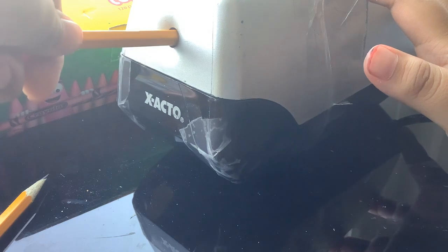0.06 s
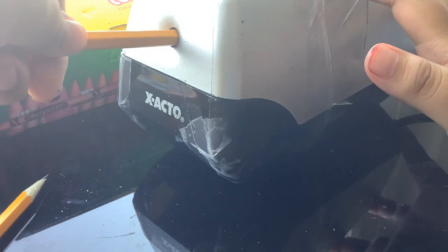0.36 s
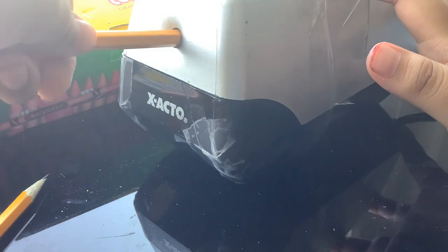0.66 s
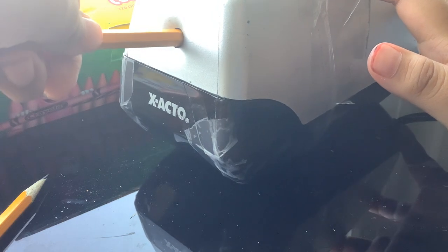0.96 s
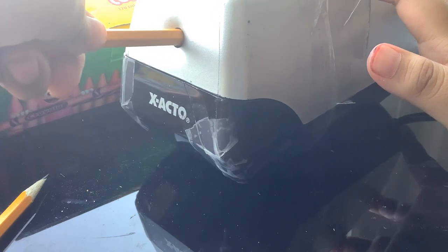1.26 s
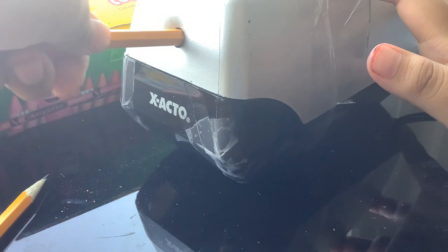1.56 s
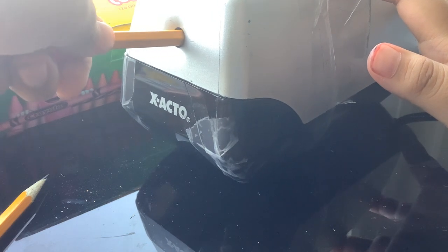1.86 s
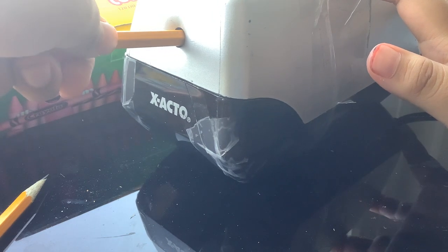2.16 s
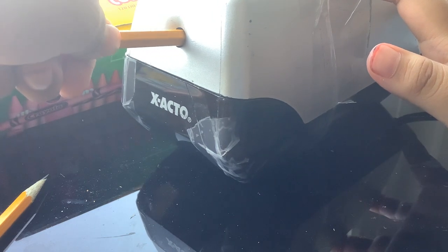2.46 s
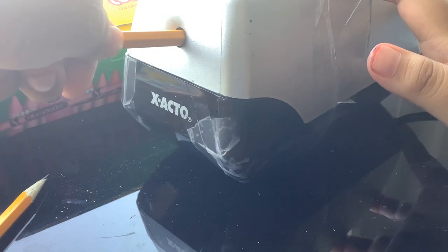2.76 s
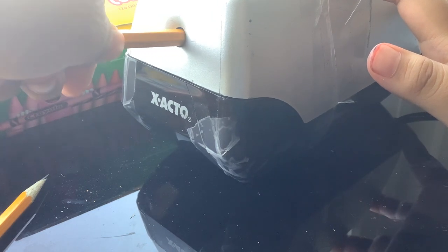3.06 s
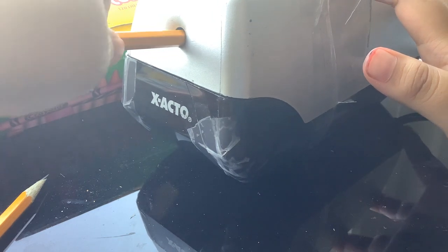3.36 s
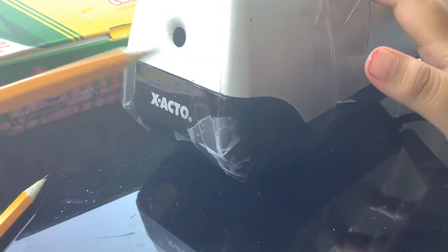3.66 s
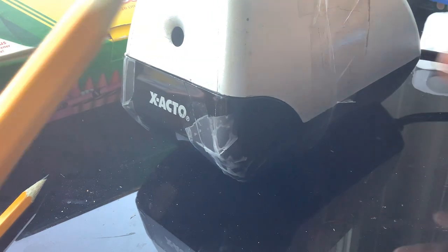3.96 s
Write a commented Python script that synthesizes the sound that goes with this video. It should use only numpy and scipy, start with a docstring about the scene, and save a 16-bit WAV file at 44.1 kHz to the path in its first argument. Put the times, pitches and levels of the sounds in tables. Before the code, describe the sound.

Close by, an electric pencil sharpener drones and chews through wood, its plastic housing rattling. The pulsing grind grows smoother as the point forms, then drops to a light whir with a soft knock as the pencil slides out.

```python
"""An electric pencil sharpener on a desk grinds a pencil, heard from close by.
From the start a humming mains motor drives a cutter round the blunt wood. Each flute (cutting edge)
knocks the plastic housing and tears off a hissing chip. The hiss sweeps upward twice a turn, and the
cutter bites harder once a turn. By about 3 s the point has formed and the sound is smoother.
At 3.5 s the pencil is drawn back: the housing rocks, and the mechanism rattles on lightly."""
import sys
import numpy as np
from scipy import signal
from scipy.fft import rfft, irfft
from scipy.io import wavfile

SR = 44100
rng = np.random.default_rng(int(sys.argv[2]) if len(sys.argv) > 2 else 0)


def transcribe(signal):
    """Save signal, clipped to [-1, 1], as a 16-bit WAV file at the path in sys.argv[1]."""
    frames = np.atleast_2d(signal).T
    limited = np.clip(frames, -1, 1)
    pcm = np.round(limited * 32767).astype(np.int16)
    wavfile.write(sys.argv[1], SR, pcm)


N = 176400
T = np.arange(N) / SR
HZ = np.fft.rfftfreq(8192, 1 / SR)

# the tones of the motor's hum (frequency [Hz], relative level [dB], phase waver [rad])
HUM_TONES = [(60.3, -69, .2), (120.6, -29.5, .27), (239, -55, 0.34), (359.2, -30.5, 0.41)]
# how the whole hum rises and falls (time [s], gain [dB])
HUM_GAIN = [(0, -2), (1.2, 0), (2.5, -3), (3.2, -8), (3.52, -2), (3.62, -8.5), (4, -13.5)]
# the cutter spinning free of the wood (time [s], level [dB])
FREE_SPIN_LEVEL = [(3.45, -72), (3.52, -36), (3.58, -34), (3.65, -43), (3.7, -40), (3.77, -46),
                   (3.82, -32.5), (3.9, -37), (3.96, -33), (4, -51)]
# where the free cutter rings (frequency [Hz], width [Hz], relative level [dB])
FREE_SPIN_RESONANCES = [(337, 40, 5), (550, 50, 4), (1013, 74, 4), (1180, 75, -.5), (2040, 45, -19),
                        (2210, 71, -10), (2780, 310, -23)]
# the housing rocks back once (time [s], level [dB], half length [s], frequency [Hz], width [Hz])
HOUSING_ROCK = (3.528, -30.5, .02, 127, 12)
# the loose pencil rubs the cutter (time [s], level [dB], half length [s])
PENCIL_SCRAPES = [(3.504, -36, 0.011), (3.568, -37, 0.018), (3.586, -38, 0.0053), (3.623, -40, 0.014),
                  (3.695, -43, 0.027), (3.736, -42, 0.028), (3.828, -41, 0.035), (3.882, -45.5, 0.02),
                  (3.93, -39, 0.008)]
# the loose pencil ticks against the cutter (time [s], level [dB])
PENCIL_TICKS = [(3.535, -34), (3.584, -28), (3.591, -30), (3.618, -28), (3.682, -34), (3.716, -28),
                (3.732, -38), (3.807, -32), (3.925, -32), (3.987, -39)]
# where the scrapes and ticks ring (frequency [Hz], width [Hz], relative level [dB])
RUB_RESONANCES = [(2184, 230, 6.5), (3400, 660, -2.5), (5230, 1800, -7.5), (6680, 340, 1.5),
                  (7550, 310, -5), (8330, 970, -11), (10800, 2500, -13.5), (13300, 300, -4),
                  (14800, 900, -10)]
# the lead squeaks on the cutter (time [s], level [dB], half length [s], frequency [Hz], width [Hz])
LEAD_SQUEAKS = [(1.076, -19.5, 0.0036, 7400, 560), (1.205, -30, 0.0061, 7350, 600),
                (3.634, -42, 0.023, 6750, 260), (3.745, -44, .018, 13350, 200),
                (3.795, -44, .003, 13350, 170)]
# echoes off the shavings tray and the desk (delay [s], gain [ratio])
NEAR_ECHOES = [(.0011, 0.22), (.0027, -0.22), (.0046, -0.00053), (.0079, 0.026)]

# the cutter's progress, quicker as the load eases; two passes make a turn (time [s], passes [count])
CUTTER_PASSES = [(0, .05), (.746, 11), (1.171, 17), (1.716, 25), (2.24, 33), (2.875, 43), (3.055, 46),
                 (4, 62.5)]
# the shape of the tip (blunt until [s], cone from [s], cone until [s], point from [s])
TIP_STAGES = [.75, 1.651, 2.35, 3.05]
# how loud the force on the cutter makes the grinding (time [s], level [dB])
GRIND_LEVEL = [(0, -19), (.8, -21.5), (1.3, -19.5), (2, -20.5), (2.7, -19.5), (3.05, -22), (3.5, -22),
               (3.6, -31), (3.87, -30.5), (3.96, -40), (4, -30)]
# the drone's tones at 1, 2 and 3 times the flute rate (level against GRIND_LEVEL [dB])
DRONE_LEVELS = [-10.5, -16, -15.5]
# the cutter digs in and shakes the housing (time [s], grinding boost [dB], half length [s])
CUTTER_DIGS = [(.025, 3, 0.036), (0.162, 8.5, 0.024), (0.402, 1.5, 0.0078), (.46, 8, 0.0069),
               (0.582, 5.5, .022), (0.652, 7.5, 0.0097), (0.7, 7.5, 0.011), (0.855, 7.5, 0.015),
               (0.941, 7.5, .009), (0.972, 3.5, .014), (1.061, 7, 0.012), (1.134, 9, 0.0064),
               (1.242, 1, 0.036), (1.343, 6, 0.018), (1.423, 3, 0.007), (1.56, 3.5, 0.0077),
               (1.738, 3, 0.014), (1.825, 5, 0.013), (1.92, 3, 0.011), (2, 4.5, .009), (2.032, 6, 0.0043),
               (2.08, 6, 0.0083), (2.44, 4.5, 0.01), (2.552, 2.5, 0.016), (3.12, 0, 0.0082),
               (3.23, 3, 0.016), (3.365, 4.5, 0.0064), (3.697, 4, 0.027), (3.828, 3, .022)]
# where the plastic housing and tray ring (frequency [Hz], width [Hz], relative level [dB])
HOUSING_RESONANCES = [(141.6, 34, -5.5), (194.8, 29, 1.5), (259.5, 7.9, 0), (358, 47.6, -3), (427, 140, -7),
                      (525, 26.7, -1), (633, 47, -4), (943, 148, -11), (1140, 90, -13), (1283, 73, -13.5),
                      (1570, 240, -19.5), (2102, 226, -17.5), (2334, 55, -18), (2768, 296, -21.5)]
# the housing's low boom against the rest of the grinding (time [s], gain [dB])
BOOM_GAIN = [(0, 0.5), (.6, 3.5), (1.2, 2), (1.7, 1), (2.5, -1), (2.9, 1.5), (3.2, -2), (3.6, -2), (4, 5)]

# the hiss of wood being cut (time [s], level [dB])
CUT_LEVEL = [(0, -29), (1, -28), (1.7, -27), (2.4, -26.5), (2.85, -27), (3.1, -30.5), (3.48, -32),
             (3.51, -47), (3.55, -57), (4, -72)]
# larger shavings peel off (time [s], strength [relative])
PEELS = [(.415, 0), (1.078, 8.5), (1.2, 7), (1.23, 0), (1.378, -2), (1.45, 3.5), (1.852, 3), (2.38, 3),
         (2.433, 2), (2.509, 8), (2.68, 4.5)]
# tone colour of the hiss on blunt wood (frequency [Hz], relative level [dB])
BLUNT_COLOUR = [(1760, -46), (3000, -5), (3540, -5), (3820, 0), (4660, 1.5), (5420, 6), (5920, 1.5),
                (6570, -0.5), (6750, 2), (7740, 1), (8470, -2.5), (9780, 5.5), (10300, 2), (11400, -7.5),
                (12200, 4.5), (12900, 5), (13700, 2), (15500, -10)]
# the same on the half-formed cone (frequency [Hz], relative level [dB])
CONE_COLOUR = [(1800, -44), (3000, 0), (3700, -1.5), (4500, 1.5), (5500, 4.5), (6400, -0.5), (7600, 3),
               (8300, -2), (9600, 6.5), (11400, -0.5), (12700, 8.5), (13800, 6), (14700, -1), (15500, -2)]
# the same on the finished point (frequency [Hz], relative level [dB])
POINT_COLOUR = [(1760, -31), (3000, -1), (3840, -6), (4000, -10), (4630, -4), (5640, -4), (6170, -1),
                (6890, -6), (7480, -1), (10600, -3), (12200, -6), (13200, -3), (15500, -12)]
# each pass sweeps up through the hiss (frequency [Hz], peak moment [passes], swing at strength 1 [dB])
HISS_SWEEP = [(3000, .15, .5), (4200, .2, 1.7), (5300, .25, 2), (6200, .35, 2.3), (7000, .53, 2.8),
              (8200, .57, 2.4), (9000, .68, 1.4), (9700, .95, 1.9), (11500, 1.15, 1.4), (12500, .99, 2),
              (13500, 1.03, 2.5), (15200, 1.3, 2)]
# how strong that sweep is (time [s], strength [ratio])
SWEEP_STRENGTH = [(0, 1.1), (1.2, 1.3), (2.5, 1.35), (3, .8), (3.4, .2)]
# the hole behind the retreating point rings like a pipe (time [s], lowest resonance [Hz], depth [dB])
PENCIL_HOLE = [(3.25, 1680, 0), (3.4, 1770, 0.5), (3.5, 1870, 3)]

FLUTES_PER_PASS = 14
THROB_DB, BOOM_THROB_DB, HISS_THROB_DB = 0.83, 1.55, 1.15  # once-a-turn swing: grinding, boom, fizz
THROB_LAG, HISS_LAG = 0.49, -0.085  # when the grinding and the fizz peak [passes]
PEEL_HALF_S, TICK_DECAY_S = 0.0083, 0.0029
CEILING, TREBLE_LIMIT_HZ = .72, 15780  # the ceiling is a share of full scale


def amp(db):
    """Turns decibels into a gain to multiply by."""
    return 10 ** (np.asarray(db) / 20)


def evened(x):
    """Scales a signal to an average (rms) level of 1."""
    return x / np.sqrt(np.mean(x ** 2) + 1e-20)


def curve(points, times=T):
    """Joins (time, value) points with straight lines."""
    return np.interp(times, *np.transpose(points))


def swell(at, half):
    """A smooth bump in time, of height 1."""
    return np.exp(-((T - at) / half) ** 2)


def wander(hz):
    """A slow random drift of level 1; a higher hz makes it quicker."""
    keep_slow = np.exp(-(np.fft.rfftfreq(N, 1 / SR) / hz) ** 2)
    return evened(irfft(rfft(rng.standard_normal(N)) * keep_slow, N))


def uneven(chance, spread_db):
    """Turns random numbers into gains, at most twice spread_db up or down."""
    return amp(spread_db * np.clip(chance, -2, 2))


def spectrum(points):
    """The gain at each frequency, from (frequency, level) points."""
    hz, db = np.transpose(points)
    return amp(np.interp(np.log(HZ + 1), np.log(hz + 1), db))


def resonances(modes):
    """The gain at each frequency, with a peak wherever an object likes to ring."""
    return np.sqrt(sum((amp(db) / (1 + ((HZ - hz) / width) ** 2)) ** 2 for hz, width, db in modes))


def ring(x, gain):
    """Filters x with a gain for each frequency; the result has level 1."""
    log_gain = np.log(np.maximum(np.r_[gain, gain[-2:0:-1]] / gain.max(), 1e-5))
    response = np.exp(np.conj(signal.hilbert(log_gain)))  # rings after a knock, never before
    taps = np.fft.ifft(response).real[:4096]
    return evened(signal.oaconvolve(x, taps)[:N])


def reflect(x):
    """Adds the echoes off the tray and the desk; the result has level 1."""
    return evened(x + sum(gain * np.interp(T - delay, T, x, left=0) for delay, gain in NEAR_ECHOES))


def crackle(per_s, spread_db):
    """Clicks at random moments, of random sign and size."""
    clicks = (rng.random(N) < per_s / SR) * rng.choice([-1, 1], N)
    return evened(clicks * uneven(rng.standard_normal(N), spread_db))


def puffs(clicks, decay_s, steady):
    """Each click sets off a short puff of noise, on top of some steady noise."""
    fades = evened(signal.lfilter([1], [1, -np.exp(-1 / (decay_s * SR))], abs(clicks)))
    return evened(np.hypot(fades, steady) * rng.standard_normal(N))


def burst(at, db, half, hz, width):
    """A brief swell of noise around one pitch."""
    return amp(db) * swell(at, half) * ring(rng.standard_normal(N), resonances([(hz, width, 0)]))


def desk_rumble():
    """The desk rumbles faintly and steadily under the machine."""
    low_cut = np.sqrt(1 + (40 / (HZ + 1)) ** 8)
    return amp(-54) * ring(rng.standard_normal(N), resonances([(63.5, 11, 0)]) / low_cut)


def motor_hum():
    """The motor hums near multiples of the mains frequency; each tone wavers at random."""
    hum = np.zeros(N)
    for hz, db, waver in HUM_TONES:
        level = amp(db + waver * 4.6 * wander(hz=12))
        hum += level * np.sin(2 * np.pi * hz * T + waver * wander(hz=17))
    return np.sqrt(2) * hum * amp(curve(HUM_GAIN))


def free_spin():
    """Free of the wood, the cutter and its gear whirr on."""
    rattle = crackle(per_s=1700, spread_db=3)
    return amp(curve(FREE_SPIN_LEVEL)) * ring(rattle, resonances(FREE_SPIN_RESONANCES))


def housing_thud():
    """The housing rocks back with a soft, low knock as the push lets go."""
    return burst(*HOUSING_ROCK)


def pencil_rubs():
    """The pencil scrapes and ticks lightly against the cutter as it slides out."""
    light_touch = amp(-50.5) * np.clip((T - PENCIL_SCRAPES[0][0]) / 0.021, 0, 1)
    scrapes = sum(amp(db) * swell(at, half) for at, db, half in PENCIL_SCRAPES)
    ticks = sum(amp(db) * (T >= at) * np.exp(-abs(T - at) / TICK_DECAY_S) for at, db in PENCIL_TICKS)
    grit = puffs(crackle(per_s=840, spread_db=2), decay_s=.0021, steady=0.73)
    rubbing = (light_touch + scrapes) * grit + ticks * rng.standard_normal(N)
    return rubbing.std() * ring(reflect(rubbing), resonances(RUB_RESONANCES))


def lead_squeaks():
    """The lead gives brief, high chirps against the steel."""
    return sum(burst(*squeak) for squeak in LEAD_SQUEAKS)


def turn_throb(lag):
    """The wood is met harder once a turn: a swing between -1 and 1 that fades as the point forms."""
    return np.cos(np.pi * (curve(CUTTER_PASSES) - lag)) * np.interp(T, TIP_STAGES[2:], [1, 0])


def flute_drone():
    """The even beat of the flutes makes a low note that throbs and drags once a turn."""
    throb = turn_throb(THROB_LAG)
    cycles = FLUTES_PER_PASS * curve(CUTTER_PASSES) + .09 * wander(hz=6.5) - .05 * throb
    tones = sum(amp(db) * np.sin(2 * np.pi * k * cycles) for k, db in enumerate(DRONE_LEVELS, 1))
    easing = np.interp(T, TIP_STAGES[2:], [1, .4])
    return np.sqrt(2) * tones * amp(curve(GRIND_LEVEL) + 4.2 * throb) * easing


def flute_strikes(jitter_s, spread_db):
    """One click for each flute that meets the wood, uneven in time and strength."""
    on_time = np.flatnonzero(np.diff(np.floor(FLUTES_PER_PASS * curve(CUTTER_PASSES))))
    late, size = rng.standard_normal((len(on_time), 2)).T
    at = np.clip(on_time + (late * jitter_s * SR).astype(int), 0, N - 1)
    clicks = np.zeros(N)
    clicks[at] = uneven(size, spread_db)
    return clicks


def torn_chips(flutes, smooth):
    """Each flute tears off a chip, with a few splinters; smooth is the share of plain noise."""
    chips = puffs(flutes * uneven(rng.standard_normal(N), spread_db=2.1), decay_s=0.002, steady=0.87)
    splinters = puffs(crackle(per_s=160, spread_db=3.5), decay_s=.0005, steady=0)
    rough = evened(chips + amp(-12) * splinters)
    return np.sqrt(1 - smooth) * rough + np.sqrt(smooth) * rng.standard_normal(N)


def chip_colours(x, depth_db, patch_s, patch_hz):
    """No two chips sound alike: random patches of time and frequency get louder or softer."""
    bands = signal.stft(x, nperseg=256, noverlap=192)[2]
    across_bands = np.fft.fftfreq(bands.shape[0], SR / 256)[:, None]
    along_time = np.fft.fftfreq(bands.shape[1], 64 / SR)
    blur = np.exp(-(across_bands * patch_hz) ** 2 - (along_time * patch_s) ** 2)
    patches = evened(np.fft.ifft2(np.fft.fft2(rng.standard_normal(bands.shape)) * blur).real)
    return evened(signal.istft(bands * uneven(patches, depth_db), nperseg=256, noverlap=192)[1][:N])


def cutter_sweep(x):
    """The circling cutter sweeps the hiss upward on every pass; near the end the emptying hole rings."""
    hz, t, bands = signal.stft(x, SR, nperseg=256, noverlap=192)
    sweep_hz, lags, swings = np.transpose(HISS_SWEEP)
    lag = np.interp(hz, sweep_hz, lags)[:, None]
    swing_db = curve(SWEEP_STRENGTH, t) * np.interp(hz, sweep_hz, swings)[:, None]
    sweep_db = swing_db * np.cos(2 * np.pi * (curve(CUTTER_PASSES, t) - lag))
    at, hole_hz, hole_db = np.transpose(PENCIL_HOLE)
    # a pipe closed at one end rings at 1, 3, 5... times its lowest resonance
    pipe_db = -np.interp(t, at, hole_db) * np.cos(np.pi * hz[:, None] / np.interp(t, at, hole_hz))
    return signal.istft(bands * amp(sweep_db + pipe_db), nperseg=256, noverlap=192)[1][:N]


def wood_hiss(flutes, bite_db):
    """Cut wood gives a rasp and a finer fizz; both change colour and smooth out as the point forms."""
    blunt = np.interp(T, TIP_STAGES[:2], [1, 0])
    point = np.interp(T, TIP_STAGES[2:], [0, 1])
    smooth = 0.35 * point
    peel = sum(strength * swell(at, PEEL_HALF_S) for at, strength in PEELS)
    lows, highs = (signal.butter(4, 8500, side, fs=SR, output="sos") for side in ("low", "high"))
    rasp = signal.sosfilt(lows, torn_chips(flutes ** 0.84, smooth))
    rasp *= amp(0.19 * peel + 0.49 * bite_db)
    fizz = signal.sosfilt(highs, torn_chips(flutes, smooth))
    fizz *= amp(1.04 * peel + HISS_THROB_DB * turn_throb(HISS_LAG) - 0.1)
    cut = chip_colours(rasp + fizz, depth_db=1.2, patch_s=0.042, patch_hz=900)
    cut = reflect(cutter_sweep(cut))
    stages = [(blunt, BLUNT_COLOUR), (1 - blunt - point, CONE_COLOUR), (point, POINT_COLOUR)]
    return amp(curve(CUT_LEVEL)) * sum(share * ring(cut, spectrum(colour)) for share, colour in stages)


def grinding(flutes, bite_db):
    """Flute strikes and gear chatter make the plastic housing ring and boom."""
    crunch = amp(0.5) * puffs(flutes, decay_s=0.0045, steady=0.62)
    chatter = amp(-2) * crackle(per_s=1000, spread_db=3.5)
    low_cut = np.sqrt(1 + (107 / (HZ + 1)) ** 7)
    body = ring(amp(-6) * evened(flutes) + crunch + chatter, resonances(HOUSING_RESONANCES) / low_cut)
    boom = signal.sosfiltfilt(signal.butter(4, 290, fs=SR, output="sos"), body)
    throb = turn_throb(THROB_LAG)
    boom_gain = amp(curve(BOOM_GAIN) + BOOM_THROB_DB * throb - 0.27 * bite_db)
    level = amp(curve(GRIND_LEVEL) + bite_db + THROB_DB * throb)
    return level * (body - boom + boom * boom_gain)


def scene():
    """Mixes all the sounds into one channel; the same strikes drive the grinding and the hiss."""
    flutes = flute_strikes(jitter_s=.0006, spread_db=3.0)
    bite_db = sum(db * swell(at, half) for at, db, half in CUTTER_DIGS)
    cutting = grinding(flutes, bite_db) + wood_hiss(flutes, bite_db) + flute_drone()
    behind = motor_hum() + pencil_rubs() + lead_squeaks() + free_spin() + housing_thud() + desk_rumble()
    return (cutting + behind)[None]


def record(dry):
    """Rounds off the tallest peaks, then cuts the very highest treble."""
    rounded = dry / (1 + (dry / CEILING) ** 4) ** .25
    treble_cut = signal.firwin(511, TREBLE_LIMIT_HZ, window=("kaiser", 9), fs=SR)
    return signal.oaconvolve(rounded, treble_cut[None], "same")


dry = scene()
out = record(dry)
transcribe(out)
```